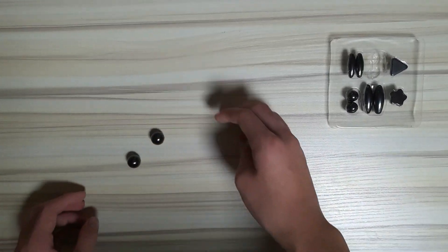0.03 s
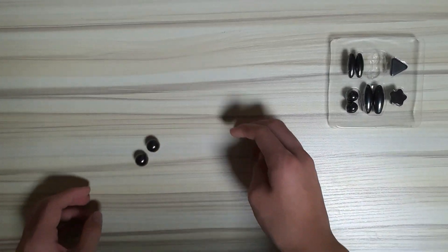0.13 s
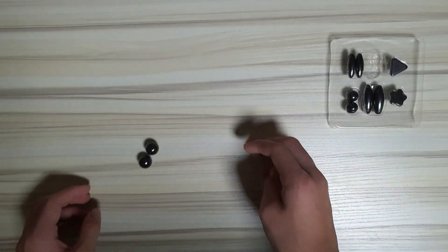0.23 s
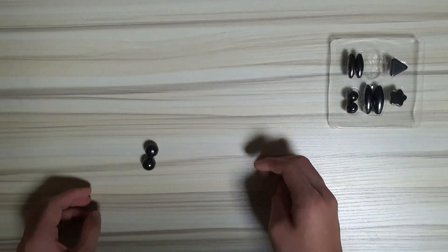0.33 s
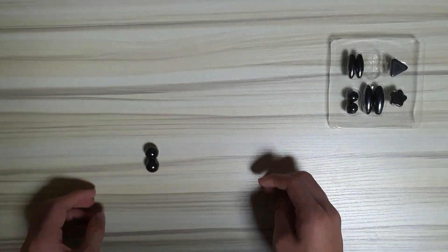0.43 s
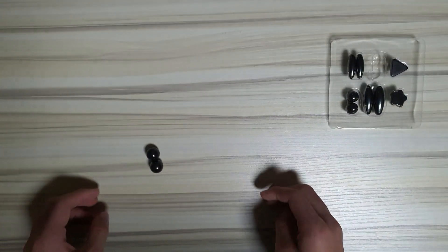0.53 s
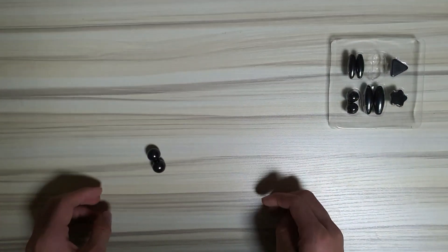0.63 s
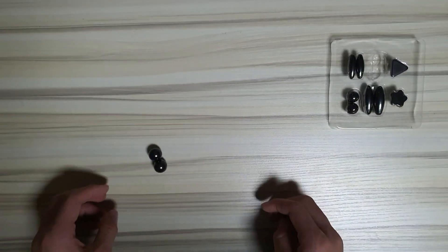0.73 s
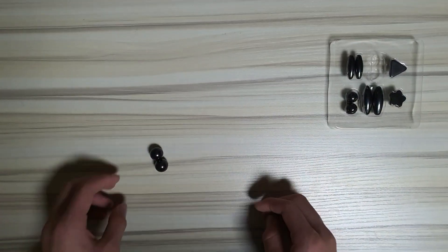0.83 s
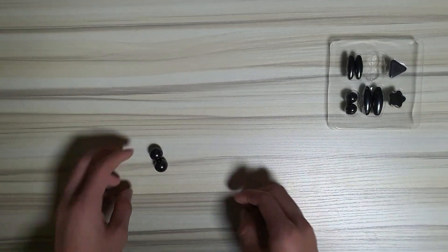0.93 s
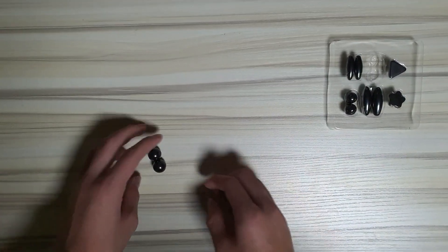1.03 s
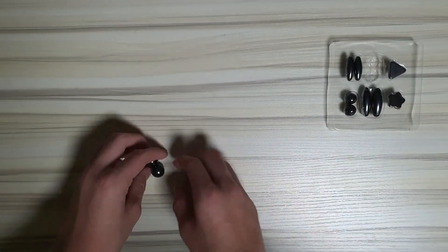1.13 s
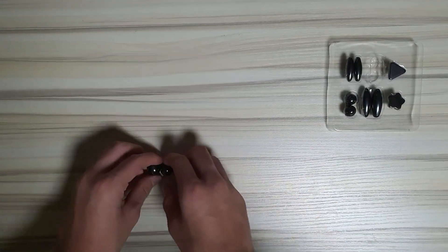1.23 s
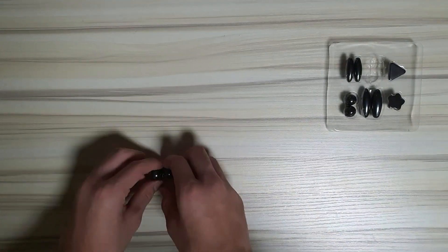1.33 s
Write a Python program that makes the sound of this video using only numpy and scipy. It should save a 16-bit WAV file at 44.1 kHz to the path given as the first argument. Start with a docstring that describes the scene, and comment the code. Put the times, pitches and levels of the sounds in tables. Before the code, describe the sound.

Magnet balls snap together on a wooden table, heard close in a small room. Faint low rolling opens; at 0.23 seconds a hard bright click starts a rattle, accelerating by 0.43 into a buzz that rises in pitch, weakens and locks at about 0.67. A short ringing tail fades to near silence. Around 1.23 fingers scuff softly, then small wooden bumps and rolling follow at 1.30-1.40.

```python
"""Two polished magnet balls roll together on a wooden table in a small room and snap shut.
They rebound ever faster, from a rattle to a rising buzz, spinning on the table until they lock.
Then fingers brush over the table, take hold of the pair and roll it.
Each collision is an impulse turned into a bright click, with echoes and metallic overtones.
Rolling is a stream of tiny random knocks that ring the wood; skin and air are shaped noise."""
import sys
import numpy as np
from scipy import signal
from scipy.fft import rfft, irfft
from scipy.io import wavfile
from scipy.ndimage import uniform_filter1d

SR = 44100
rng = np.random.default_rng(int(sys.argv[2]) if len(sys.argv) > 2 else 0)


def dump_mix(stems):
    """Bounce the given channels to the path in sys.argv[1] as a 16-bit WAV at rate SR."""
    frames = np.atleast_2d(stems).T  # one column per channel
    limited = np.clip(frames, -1, 1)  # hard clip at full scale
    pcm = np.round(limited * 32767).astype(np.int16)
    wavfile.write(sys.argv[1], SR, pcm)


N = 61740
TIME = np.arange(N) / SR

# First collisions, nearly equal in strength, following each other ever faster.
# Each row: time in seconds, strength in dB.
FIRST_SNAPS = [(.2301, 1), (.2649, 2), (.2918, 2.5), (.3108, 1.5), (.3271, 1), (.3423, 1.5), (.3547, .5),
               (.3657, 2.5), (.3767, .5), (.3867, -.5), (.3953, -.5), (.4039, 1), (.4114, 0), (.4189, -.5),
               (.4266, -1), (.4334, .5)]
# The buzz that follows. Each row: time in seconds, collisions per second.
BUZZ_SPEED = [(.4335, 139), (.4830, 185), (.5332, 250), (.56, 310), (.59, 338), (.615, 485), (.672, 900)]

CLICK_GAIN_DB = 8  # shared by the clicks and their metallic overtones
TONE_WAVER_HZ, TONE_WAVER_S = 6.4, .016  # rms pitch waver and its smoothing time


def amp(db):
    """Turns decibels into a gain."""
    return 10 ** (np.asarray(db) / 20)


def unit(x):
    """Scales a sound to an rms of one."""
    return x / np.sqrt(np.mean(x ** 2) + 1e-20)


def read(points, hz):
    """Reads a curve between its points on a log-frequency axis."""
    f, value = np.transpose(points)
    return np.interp(np.log(hz + 1), np.log(f + 1), value)


def level(points, t):
    """Gain along a curve of seconds and dB, silent outside it."""
    s, db = np.transpose(points)
    inside = (t >= s[0]) * (t <= s[-1])
    return amp(np.interp(t, s, db)) * inside


def convolve(x, h):
    """Convolves every channel and keeps the scene's length."""
    return signal.fftconvolve(np.atleast_2d(x), np.atleast_2d(h), axes=1)[:, :N]


def colour(points, peaks=(), size=8192):
    """Filter with a broad spectrum and resonances on top, starting at once, with an energy of one."""
    hz = abs(np.fft.fftfreq(size, 1 / SR))
    power = amp(read(points, hz)) ** 2
    for f, width, db in peaks:
        power = power + amp(db) ** 2 / (1 + ((hz - f) / width) ** 2) ** 2
    # The Hilbert transform finds the phase that puts the energy as early as possible.
    spectrum = np.exp(np.conj(signal.hilbert(.5 * np.log(power + 1e-10))))
    h = np.fft.ifft(spectrum).real[:size // 2]
    return h / np.linalg.norm(h)


def impulses(times, gains):
    """Places one impulse at each time."""
    places = np.round(np.asarray(times) * SR).astype(int)
    return np.bincount(np.clip(places, 0, N - 1), gains, N)


def pan(db):
    """Left and right gains for a level difference, left minus right."""
    return amp(np.vstack([db, -db]) / 2)


def wander(seconds):
    """Smooth random motion with an rms of one: noise averaged twice over a short window."""
    size = int(seconds * SR)
    smooth = uniform_filter1d(rng.standard_normal(N), size)
    return unit(uniform_filter1d(smooth, size))


def wavering_phase(hz):
    """Running phase, in radians, of a tone whose pitch wavers at random."""
    return 2 * np.pi * np.cumsum(hz + TONE_WAVER_HZ * wander(TONE_WAVER_S)) / SR


def narrow(x, points):
    """Scales the difference between left and right, band by band."""
    mid, side = (x[0] + x[1]) / 2, (x[0] - x[1]) / 2
    width = read(points, np.fft.rfftfreq(2 * N, 1 / SR))
    side = irfft(rfft(side, 2 * N) * width)[:N]
    return np.array([mid + side, mid - side])


def scatter(t60, rise, size=512):
    """A brief smear of noise for each microphone, with a nearly flat spectrum."""
    t = TIME[:size]
    shape = np.minimum((t + 1 / SR) / rise, 1) * amp(-60 * np.maximum(t - rise, 0) / t60)
    h = rng.standard_normal((2, size)) * shape
    for _ in range(2):  # flatten the spectrum, then restore some of the fade
        z = rfft(h, 2 * size)
        h = irfft(z / (abs(z) + 1e-9))[:, :size] * np.sqrt(shape)
    return h / np.linalg.norm(h, axis=1, keepdims=True)


def room(x, size=24000):
    """Diffuse tail of the small room: noise in which each band dies at its own speed."""
    # Each row: frequency in Hz, time to fall by 60 dB in seconds.
    decay_times = [(100, 0.39), (220, 0.44), (520, 0.2), (800, 0.34), (1000, 0.29), (1600, 0.32),
                   (4000, 0.21), (7500, 0.3), (11000, 0.27), (16000, 0.21)]
    onset_s = 0.0063
    hz, t, z = signal.stft(rng.standard_normal((2, size)), SR, nperseg=256)
    fade = amp(-60 * t / read(decay_times, hz)[:, None])
    tail = signal.istft(z * fade, SR, nperseg=256)[1][:, :size]
    tail = tail * np.minimum(TIME[:size] / onset_s, 1) ** 2
    return convolve(x, tail / np.linalg.norm(tail[0]))


def air():
    """The very quiet floor of the room: steady noise, partly shared by both channels."""
    # Colour of the floor. Each row: frequency in Hz, level in dB.
    air_colour = [(20, -6), (55, 0.5), (130, -4), (400, -13), (1200, -14.5), (2200, -24.5), (8000, -29.5),
                  (16000, -37)]
    noise = rng.standard_normal((2, N)) + rng.standard_normal(N)
    return amp(-75.5) * unit(convolve(noise, colour(air_colour)))


def fingers():
    """Skin sliding over the wood, and short scuffs, as the hands close on the pair: shaped noise."""
    # Sliding between the scuffs. Each row: time in seconds, level in dB.
    slide = [(1.12, -91), (1.205, -77.5), (1.218, -55), (1.235, -46.5), (1.27, -64), (1.33, -58),
             (1.40, -96)]
    # Fingertips brushing the table and the balls. Each row: start in seconds, level in dB.
    brushes = [(1.229, -46), (1.235, -41), (1.2455, -44), (1.252, -42), (1.313, -45)]
    # Colour of rubbed skin. Each row: frequency in Hz, level in dB.
    skin = [(100, -22.5), (400, -3), (1500, -2), (3000, 2.5), (3800, -5.5), (4600, 0), (5500, -7),
            (7200, -7), (10000, -19), (15000, -29.5)]
    rise_s, fade_s, room_db = 0.00097, 0.0023, -0.5
    touch = level(slide, TIME)
    for start, db in brushes:
        age = np.maximum(TIME - start, 0)
        touch = touch + amp(db) * np.minimum(age / rise_s, 1) * np.exp(-age / fade_s)
    scuff = convolve(rng.standard_normal((2, N)) * touch, colour(skin))
    return scuff + amp(room_db) * room(scuff)


def standing_waves():
    """Two low resonances that swell under the rolling and hang on after it; the upper one wavers."""
    # Lower resonance. Each row: time in seconds, level in dB.
    hum_level = [(.2, -56.5), (.29, -43), (.42, -47), (.53, -66), (.62, -48.5), (.70, -50), (.77, -59.5),
                 (.83, -75), (.92, -92)]
    # Upper resonance. Each row: time in seconds, level in dB.
    upper_level = [(0, -33.5), (.05, -49), (.14, -41.5), (.2, -50.5), (.46, -36.5), (.62, -59), (.70, -45),
                   (.76, -54.5), (.81, -75), (.94, -85.5)]
    hum_hz, upper_hz = 201, 553
    hum = level(hum_level, TIME) * np.sin(2 * np.pi * (hum_hz * TIME + rng.random()))
    upper = level(upper_level, TIME) * np.sin(wavering_phase(upper_hz))
    return hum + upper


def rings():
    """Two wavering tones of the table top, heard out of phase at the two microphones."""
    # Lower tone. Each row: time in seconds, level in dB.
    low_level = [(0, -52), (.09, -42.5), (.2, -56), (0.241, -24.5), (0.291, -41.5), (.34, -31.5),
                 (.41, -39), (.46, -25), (.51, -36.5), (.59, -32), (0.654, -50.5), (0.679, -58.5),
                 (.8, -110), (1.28, -79), (1.322, -30.5), (1.345, -51), (1.40, -66)]
    # Higher tone. Each row: time in seconds, level in dB.
    high_level = [(.2, -54), (.33, -41), (.5, -37), (.57, -45), (.63, -32), (.66, -28.5), (.70, -74),
                  (.8, -110), (1.27, -79), (1.305, -38), (1.325, -43.5), (1.40, -57)]
    low_hz, high_hz, room_db = 970, 1507, -14.5
    phases = np.array([[0], [1.5]])  # left and right, in radians
    tones = np.zeros((2, N))
    for hz, points in [(low_hz, low_level), (high_hz, high_level)]:
        tones += level(points, TIME) * np.sin(wavering_phase(hz) + phases)
    return tones + amp(room_db) * room(tones)


def rolling_grains():
    """Rolling contact: tiny knocks at random moments, up or down and uneven, with an rms of one."""
    grains_per_s, spread_db = 2500, 2.5
    grains = (rng.random((2, N)) < grains_per_s / SR) * rng.choice([-1, 1], (2, N))
    uneven = np.minimum(rng.exponential(1, (2, N)), 3)
    return unit(grains * amp(spread_db * uneven))


def bump_force():
    """Bumps of the balls on the wood: each is a short, rounded push."""
    # Each row: time in seconds, level in dB.
    bumps = [(1.3038, -23.5), (1.3153, -14), (1.3211, -13)]
    contact_s = .0004
    s, db = np.transpose(bumps)
    contact = np.sin(np.pi * np.minimum(TIME / contact_s, 1)) ** 2
    return convolve(impulses(s, amp(db)), contact / contact.sum())[0]


def table(force):
    """Rolling grains, bumps and the chatter of the collisions ring the wooden table top."""
    # Free rolling of the balls. Each row: time in seconds, level in dB.
    rolling = [(0, -45.5), (.045, -37), (.065, -41.5), (.15, -44), (.172, -35.5), (.19, -40), (.24, -32.5),
               (.33, -39.5), (.46, -34.5), (.53, -36.5), (.59, -38), (.655, -35), (.69, -60.5), (.74, -72)]
    # Rolling in the fingers. Each row: time in seconds, level in dB.
    handling = [(1.10, -98), (1.13, -86.5), (1.17, -69), (1.2, -64), (1.24, -46.5), (1.28, -50),
                (1.315, -35.5), (1.34, -42), (1.40, -42)]
    # Colour of the contact while the balls roll freely. Each row: frequency in Hz, level in dB.
    free_colour = [(50, 0.5), (170, -3.5), (260, -2.5), (400, 1.5), (650, 3.5), (1500, -1.5), (2200, -1.5),
                   (3000, -0.5), (6000, 0), (16000, 1)]
    # Colour while fingers press the pair onto the wood. Each row: frequency in Hz, level in dB.
    grip_colour = [(50, 5), (150, 1), (320, 0), (550, 3), (1000, 0.5), (1500, -3), (2500, 1), (5000, 2.5),
                   (16000, -1)]
    # Broad response of the table under a rolling ball. Each row: frequency in Hz, level in dB.
    wood = [(40, -20.5), (130, -16), (180, -19), (260, 0.5), (800, -11.5), (1600, -8.5), (2500, -34),
            (3300, -31.5), (6000, -44.5), (9000, -49), (16000, -59.5)]
    # Resonances of the table top. Each row: frequency in Hz, width in Hz, level in dB.
    resonances = [(134, 10, -15), (285.4, 19, 8), (328, 61.5, 2), (520, 35, 3), (606.7, 13, 2.5),
                  (765, 150, -5.5), (983, 21, 6), (1107, 26, -6.5), (1283, 20, 5), (1578, 49, -1),
                  (1900, 300, -11), (2210, 250, -9.5), (2290, 35, -13), (2830, 23, -14)]
    # Stereo width of the table. Each row: frequency in Hz, factor on the left-right difference.
    table_width = [(60, .3), (200, 0.1), (400, .12), (560, .2), (800, 0.7), (1100, 0.8), (2000, 0.25),
                   (4000, 1)]
    # Fine hiss of the balls as they gather speed. Each row: time in seconds, level in dB.
    hiss_level = [(0, -83), (.11, -63), (.17, -49.5), (.20, -54.5), (.228, -31.5), (.26, -58.5), (.30, -73)]
    # Colour of that hiss. Each row: frequency in Hz, level in dB.
    hiss_colour = [(300, -12.5), (1200, 3.5), (2300, 5), (3300, -12), (5000, -11), (8000, -21),
                   (11000, -42), (16000, -19)]
    wobble_db, wobble_s = 1, .012
    chatter_db, room_db, pan_db = -14, -6.5, -1.33

    # Up to the ringing, the first channel is the middle and the second the left-right difference.
    grains = rolling_grains()
    held = grains * level(handling, TIME)
    held[0] += bump_force()
    free = grains * level(rolling, TIME) * amp(wobble_db * wander(wobble_s))
    drive = convolve(free, colour(free_colour)) + convolve(held, colour(grip_colour))
    drive[0] += amp(chatter_db) * force
    ring = convolve(drive, colour(wood, resonances))
    mid, side = ring + amp(room_db) * room(ring)
    mid = mid + standing_waves()
    wooden = narrow([mid + side, mid - side], table_width)
    hiss = convolve(grains * level(hiss_level, TIME), colour(hiss_colour))
    return pan(pan_db) * wooden + hiss


def treble_ring(force, size=12000):
    """Narrow metallic overtones that flare whenever the collisions fall in step with them."""
    # Each row: frequency in Hz, time to fall by 60 dB in seconds, level in dB.
    overtones = [(6760, .14, -3), (7400, .12, -2), (7460, .14, -4), (7400, .12, -4), (7680, 0.15, 0),
                 (8070, .12, -1), (8260, 0.079, -1), (9740, 0.077, -2), (12200, .14, -9)]
    ring_db = -11
    t, ring = TIME[:size], 0
    for hz, t60, db in overtones:
        fade = amp(db) * np.exp(-np.log(1000) * t / t60)
        ring = ring + fade * np.sin(2 * np.pi * (hz * t + rng.random((2, 1))))
    return amp(CLICK_GAIN_DB + ring_db) * convolve(force, ring / np.linalg.norm(ring[0]))


def collisions():
    """Force impulses of the first snaps, and of the buzz whose rebounds come ever faster."""
    # Force of the buzz. Each row: time in seconds, strength of a collision in dB.
    buzz_force = [(.44, -3), (.48, -4.5), (.53, -9.5), (.59, -9.5), (.62, -14), (.655, -16.5),
                  (.672, -21.5)]
    jitter_s, spread_db = .00006, 2
    s, db = np.transpose(FIRST_SNAPS)
    snaps = impulses(s, amp(db))
    # Adding up the rate counts the collisions; each new whole number is one of them.
    count = np.cumsum(np.interp(TIME, *np.transpose(BUZZ_SPEED), left=0, right=0)) / SR
    times = TIME[1:][np.diff(np.floor(count)) > 0]
    late, strong = rng.standard_normal((len(times), 2)).T
    strength = level(buzz_force, times) * amp(spread_db * strong)
    return snaps, impulses(times + jitter_s * late, strength)


def echo_paths():
    """Mirror images off near surfaces: delayed impulses for left and right, slightly shifted."""
    # Each row: delay in seconds, left level in dB, right level in dB.
    echoes = [(.0019, -2.5, -13), (.0064, -2, -10.5), (.0076, -13.5, -8), (.0089, -9, -19.5),
              (.0112, -20, -13.5), (.0168, -4, -11), (.0235, -10, -17)]
    drift_s = .00012
    delay, left, right = np.transpose(echoes)
    drift = drift_s * rng.standard_normal((len(delay), 2))
    return [impulses(delay + drift[:, 0], amp(left)), impulses(delay + drift[:, 1], amp(right))]


def magnets(snaps, buzz, count=5):
    """Bright clicks and near echoes; the paths, and so the comb of overtones, shift as the pair turns."""
    # Colour of a first snap. Each row: frequency in Hz, level in dB.
    snap_colour = [(100, -43), (300, -24), (1000, -13.5), (2500, -6.5), (3700, -5), (4500, -6.5),
                   (6000, -3.5), (7000, 2), (7800, 0), (8800, -5), (10000, -0.5), (10800, -4.5),
                   (12300, -0.5), (14200, -7.5), (15600, -4.5)]
    # Brief ring of a hard snap. Each row: frequency in Hz, width in Hz, level in dB.
    snap_peaks = [(3600, 200, -5.5), (5470, 200, -3), (7250, 350, 0.5), (12100, 410, -5.5)]
    # Late collisions are softer and duller. Each row: frequency in Hz, level in dB.
    buzz_colour = [(100, -45), (300, -27.5), (1000, -13), (2500, -6), (3700, -2.5), (4500, -5.5),
                   (6000, -4), (7200, -1), (8800, -3), (10500, -3), (12300, -1.5), (14200, -6), (15600, -8)]
    # Ring of the weak late collisions. Each row: frequency in Hz, width in Hz, level in dB.
    buzz_peaks = [(7700, 350, 1.5), (11500, 620, -4.5)]
    # Echoes are strongest where the balls first meet. Each row: time in seconds, level in dB.
    echo_level = [(.23, -0.5), (.30, -2), (.40, -7), (.50, -6), (.67, -2)]
    # The near sound is thinner than the room's. Each row: frequency in Hz, level in dB.
    near_colour = [(100, -12), (2500, -7), (4300, -4), (6500, 1), (9000, 0), (12500, 0), (16000, 2.5)]
    pan_start_db, pan_end_db, direct_pan_db = -1, 2, -1  # left minus right
    smear_t60_s, smear_rise_s, room_db = .007, .0006, -2.5

    clicks = convolve(snaps, colour(snap_colour, snap_peaks))
    clicks = clicks + convolve(buzz, colour(buzz_colour, buzz_peaks))
    # The pair swings to the left as it turns.
    turn = np.interp(TIME, [FIRST_SNAPS[0][0], BUZZ_SPEED[-1][0]], [0, 1])
    clicks = clicks * pan(pan_start_db + (pan_end_db - pan_start_db) * turn)
    near, far = 0, 0
    for k in range(count):  # crossfade through several sets of paths
        part = clicks * np.cos(np.pi / 2 * np.clip(turn * (count - 1) - k, -1, 1))
        paths = echo_paths()
        direct = convolve(part, scatter(smear_t60_s, smear_rise_s))
        echoed = convolve(direct * level(echo_level, TIME), paths)
        near = near + pan(direct_pan_db) * direct + echoed
        far = far + room(part)
    return amp(CLICK_GAIN_DB) * (convolve(near, colour(near_colour)) + amp(room_db) * far)


def scene():
    """Magnets, table and hands in the room."""
    # Stereo width of the rattle. Each row: frequency in Hz, factor on the left-right difference.
    click_width = [(200, .3), (700, .5), (2400, .55), (4500, 0.76), (9000, 0.82), (15000, 1.2)]
    snaps, buzz = collisions()
    force = snaps + buzz
    rattle = narrow(magnets(snaps, buzz), click_width) + treble_ring(force)
    return rattle + table(force) + rings() + fingers() + air()


def record(dry):
    """Soft overload on the sharpest clicks, then bass roll-off and the upper band limit."""
    limit, bass_hz, edge_hz = 1.3, 35, 15880
    soft = limit * np.tanh(dry / limit)
    wave = signal.sosfilt(signal.butter(2, bass_hz, "high", fs=SR, output="sos"), soft)
    low_pass = signal.firwin(401, edge_hz, window=("kaiser", 9), fs=SR)
    return signal.oaconvolve(wave, low_pass[None], "same")


dry = scene()
out = record(dry)
dump_mix(out)
```